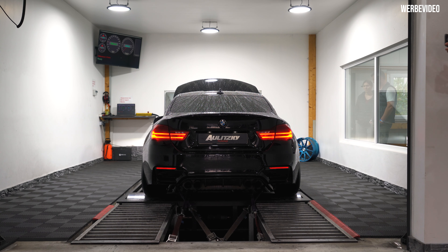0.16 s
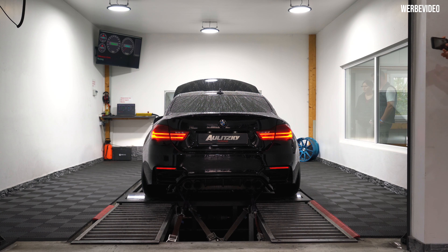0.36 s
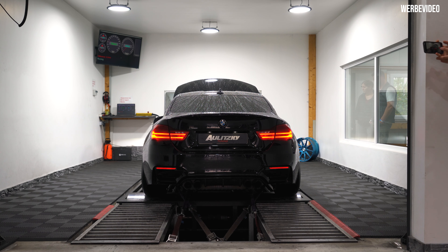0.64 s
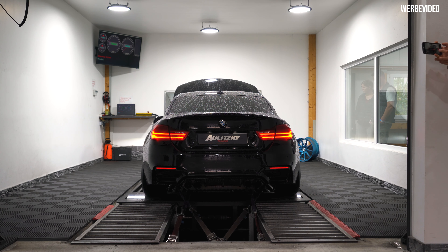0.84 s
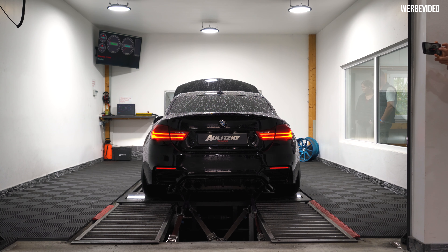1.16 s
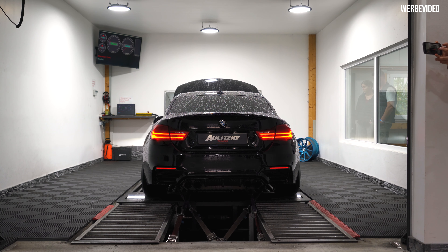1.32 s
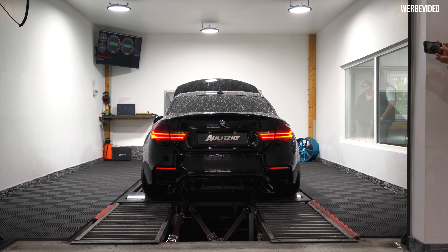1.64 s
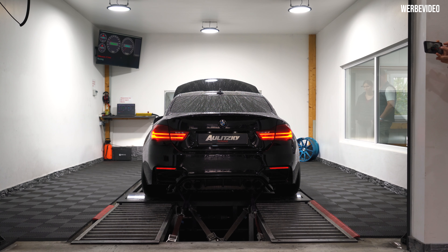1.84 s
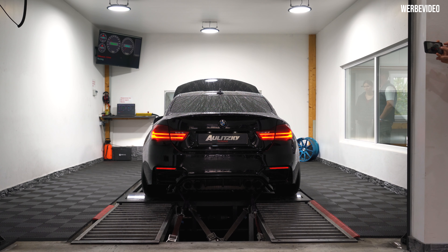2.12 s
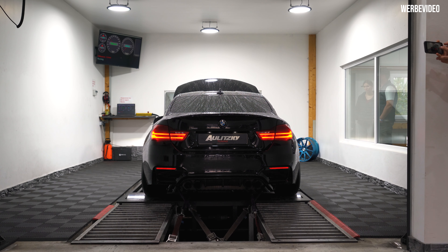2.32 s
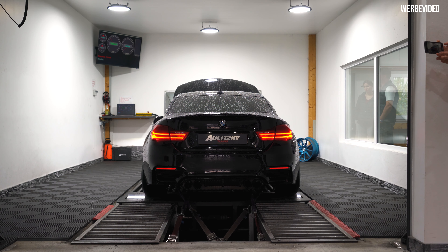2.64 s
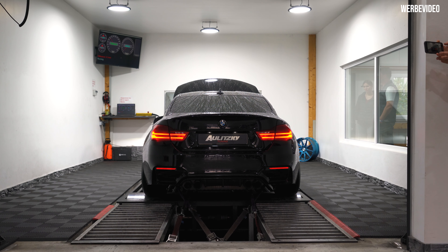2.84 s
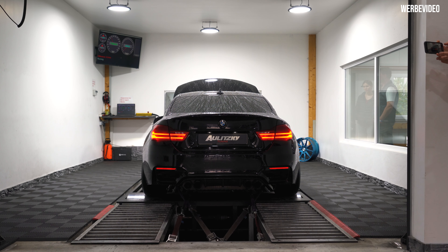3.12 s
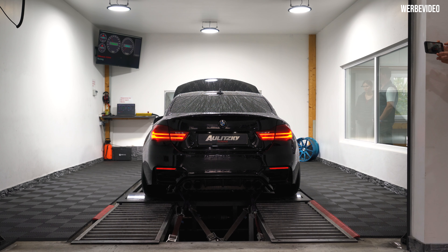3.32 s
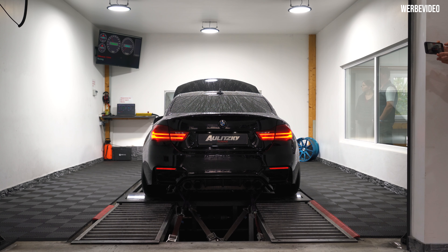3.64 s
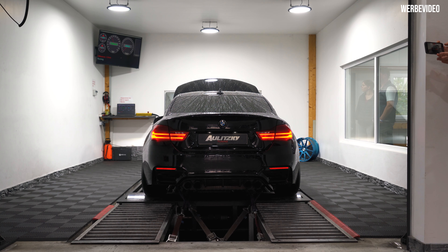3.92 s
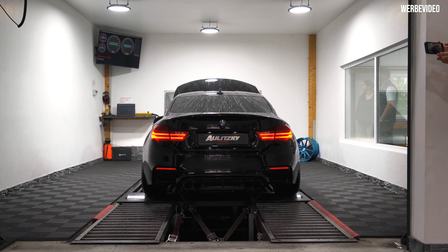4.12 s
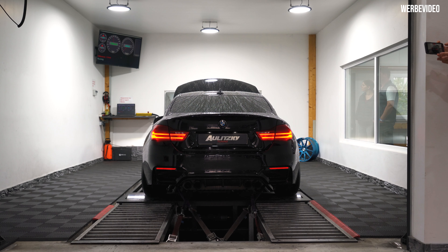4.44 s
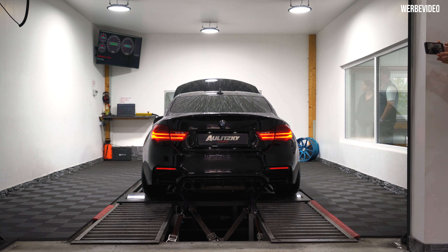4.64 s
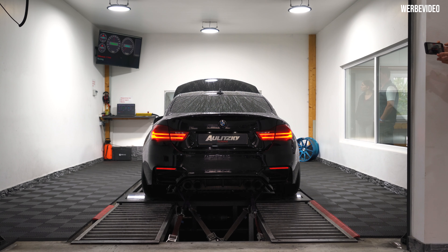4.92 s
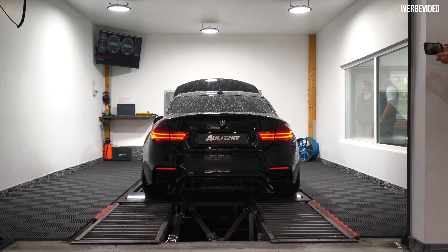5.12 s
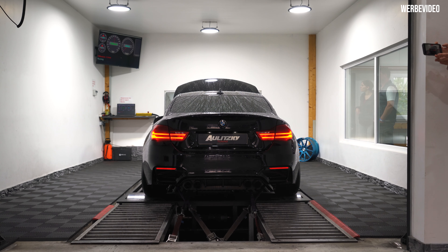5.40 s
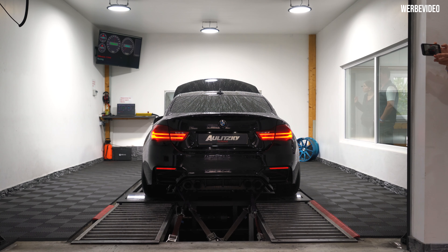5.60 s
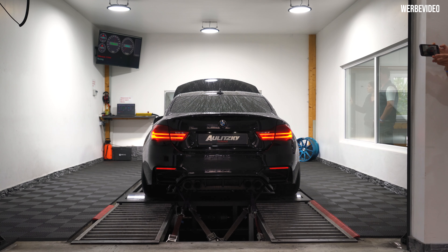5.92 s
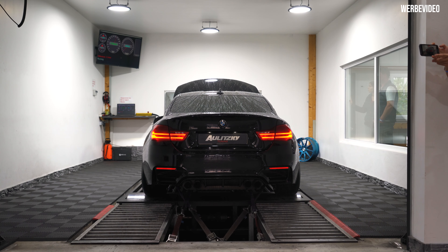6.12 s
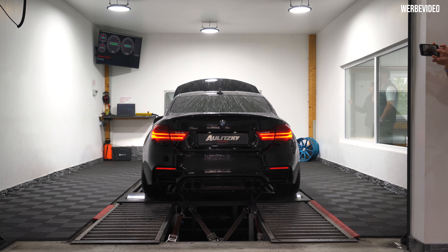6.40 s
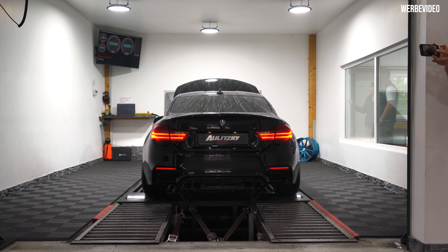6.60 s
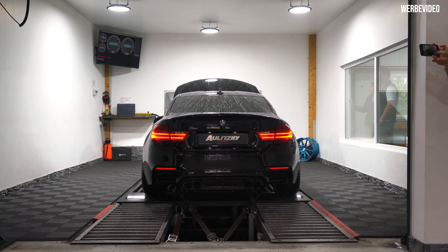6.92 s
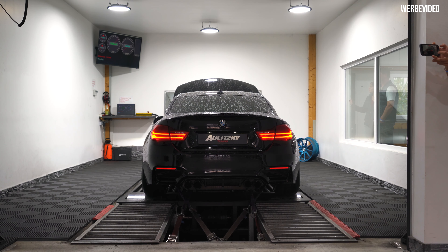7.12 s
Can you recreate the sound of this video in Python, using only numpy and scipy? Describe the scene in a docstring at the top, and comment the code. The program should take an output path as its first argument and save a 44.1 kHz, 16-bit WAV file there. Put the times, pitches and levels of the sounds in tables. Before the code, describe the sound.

Heard behind a car on rollers in a small reflective room, the engine starts as a heavy, pulsing low growl and accelerates without a gear change. Individual puffs blur into a dense drone, while gritty gas noise, faint gear whine and a brief, very thin turbo whistle join. The loud exhaust stays dominant and is still rising at the end.

```python
"""In a small hard-walled workshop a turbocharged straight-six, heard from behind, pulls at full throttle
on a chassis dyno from about 2000 to 5600 rpm. Each bank of three cylinders fires into its own pipe.
The exhaust is a stack of tones at multiples of the firing rate, which swell and fade as they climb through
the room's resonances. Shaped noise makes the gas roar, rasp and hiss; sine tones make the gears whine
and the turbo whistle."""
import sys
import numpy as np
from scipy import signal
from scipy.fft import rfft, irfft, next_fast_len
from scipy.io import wavfile
from scipy.ndimage import map_coordinates

SR = 44100
rng = np.random.default_rng(int(sys.argv[2]) if len(sys.argv) > 2 else 0)


def output_pcm(signal):
    """Save a mono or channel-first signal as 16-bit PCM at the path in sys.argv[1].

    Samples are clipped to [-1, 1] before scaling.
    """
    pcm = np.clip(np.atleast_2d(signal).T, -1, 1) * 32767
    wavfile.write(sys.argv[1], SR, np.round(pcm).astype(np.int16))


N = 320166  # length in samples

# strong low exhaust orders, before the note level and the room: columns multiple of the bank firing rate,
# level without boost/dB, level at full boost/dB, gain from lowest to top speed/dB
LOW_ORDERS = [(1.0, -39.5, -38, 13), (2.0, -15, -15.5, -1.5), (3.0, -21, -20.5, 2.5),
              (4.0, -26, -6.5, -19.5), (5.0, -29.5, -16, -6), (6.0, -29.4, -24.5, -2.5),
              (7.0, -27.5, -26.5, 2.6)]


def amp(db):
    """Turn decibels into a plain gain."""
    return 10 ** (np.asarray(db) / 20)


def unit(x):
    """Scale a signal to an rms of 1."""
    return x / np.sqrt(np.mean(x ** 2) + 1e-20)


def along(points, hz):
    """Read a value at each frequency from (Hz, value) points joined on a log axis."""
    f, v = np.transpose(points)
    return np.interp(np.log(hz + 1), np.log(f + 1), v)


def curves(rows):
    """Join timed points into one value per sample, for each column after the time."""
    s, *columns = np.transpose(rows)
    return [np.interp(np.arange(N) / SR, s, column) for column in columns]


def wobble(rate):
    """Draw a smooth random curve through a given number of random points a second."""
    knots = rng.standard_normal(int(N * rate / SR) + 4)
    coarse = np.linspace(0, N, N // 16)
    smooth = map_coordinates(knots, [coarse * rate / SR])
    return np.interp(np.arange(N), coarse, smooth)


def filtered(x, response):
    """Multiply the spectrum of x by a gain that depends on frequency."""
    size = next_fast_len(N + SR // 2)  # padded so the end does not wrap onto the start
    hz = np.fft.rfftfreq(size, 1 / SR)
    return irfft(rfft(x, size) * response(hz), size)[:N]


def noise(spectrum):
    """Colour white noise by a (Hz, dB) spectrum and scale it to an rms of 1."""
    return unit(filtered(rng.standard_normal(N), lambda hz: amp(along(spectrum, hz))))


def angle_of(hz):
    """Add up a changing frequency into its running phase in radians."""
    return 2 * np.pi * np.cumsum(hz) / SR


def lift(modes, hz):
    """Sum resonances: the real part is the dB added, the imaginary part turns the phase."""
    return sum(db / (1 + 2j * (hz - centre) / width) for centre, width, db in modes)


def brighten(x, corner_hz, db):
    """Raise or lower everything above a corner by a changing number of dB."""
    above = filtered(x, lambda hz: hz ** 6 / (hz ** 6 + corner_hz ** 6))
    return x + (amp(db) - 1) * above


def workshop(x, wet_db):
    """Add the walls' answer, a dying burst of noise, while keeping the total power about the same."""
    # time for the echo to die by 60 dB: columns f/Hz, time/s
    decay = [(60, 0.35), (1500, 0.55), (15000, 0.05)]
    hz, t, z = signal.stft(rng.standard_normal(SR // 2), SR, nperseg=256)
    t60 = along(decay, hz)[:, None]
    dying = z * amp(-60 * t / t60) / np.sqrt(t60)
    tail = signal.istft(dying, SR, nperseg=256)[1]
    echo = signal.fftconvolve(x, tail / np.linalg.norm(tail))[:N]
    return (x + amp(wet_db) * echo) / np.hypot(1, amp(wet_db))


def room_response(hz, odd):
    """Complex room gain: the pipes push together on even orders (0), against each other on odd ones (1)."""
    # broad colour of the room: columns f/Hz, even orders/dB, odd orders/dB
    room_colour = [(48.0, -2.5, -8), (62.6, 2.3, 8.7), (91, -10, -4), (155, 3.5, 2), (196, 5, 0.5),
                   (248.4, 9, 7), (316, 3, 4), (337.4, 2.5, -1.5), (384.5, 0.6, 1.5), (518, -4.5, -6),
                   (945, -9.5, -9.5)]
    # resonances that swell an order passing through: columns f/Hz, width/Hz, even lift/dB, odd lift/dB
    room_modes = [(145.8, 6.4, 8, 2.0), (164.4, 4.4, 6, 8.6), (231.5, 3.9, 5.5, 6.4), (280, 1.2, 6.5, 0.0),
                  (310.2, 6.1, -0.5, 6.7), (323.1, 2, 1.5, 8.5), (374.4, 12.6, -2, 6.7),
                  (407.5, 3, -11, 3.9), (679, 6.3, 4.0, 9.0)]
    # dips where wall reflections cancel: columns f/Hz, width/Hz, even lift/dB, odd lift/dB
    room_nulls = [(57.6, 2.0, -14, -19.6), (91.7, 10.3, -6, -5.5), (112.5, 11.7, -15.5, -16.9),
                  (131.6, 4.5, -8.5, -10.0), (152, 1.5, -3.5, -11.3), (169.4, 1.8, -17.5, -8.6),
                  (178.8, 2.5, -19, -6.8), (200.6, 0.99, -12, -1.8), (210.3, 6.1, -7.5, -10.1),
                  (223.8, 1.7, -4.5, -6.6), (236.9, 4, -8, -15.5), (258.9, 2.3, -19.5, -14.1),
                  (266.7, 6.5, -13, -5.9), (288.8, 4.9, -11.5, -8.0), (298.2, 5.5, -16.5, -2.2),
                  (383, 1.7, 2, -7.9)]
    # late reflections, which scallop the higher orders: columns f/Hz, strength beside the early sound
    late_strength = [(150, .04), (370, 0.13), (415, 0.63), (520, 0.8), (900, 0.8)]
    # random spread of their phase: columns f/Hz, spread/rad
    late_spread = [(300, 0.54), (540, 1.6), (680, 2.2)]
    late_s, ripple_step_hz = .0868, 17  # mean delay; span over which their phase stays alike
    phase_turn = 0.52  # share of a mode's phase turn that reaches the pulses; direct sound keeps them crisp
    late_gain_db = 1.24  # extra level at a late strength of 1

    colour = np.array(room_colour)[:, [0, 1 + odd]]
    modes = lift(np.array([*room_modes, *room_nulls])[:, [0, 1, 2 + odd]], hz)
    early = amp(along(colour, hz) + modes.real + 1j * phase_turn * modes.imag)
    scatter = map_coordinates(rng.standard_normal(size=512), [hz / ripple_step_hz])
    late = np.exp(1j * (along(late_spread, hz) * scatter - 2 * np.pi * hz * late_s))
    ripple = along(late_strength, hz)
    return early * (1 + ripple * late) * amp(late_gain_db * ripple)


def boom(angle, bank_hz, revs, boost, drift, flutter_db):
    """Add the lowest orders into one pressure pulse per firing, each swelling and fading with the room."""
    # exhaust note: columns t/s, level/dB
    note_level = [(0.0, 6.2), (0.9, 0.5), (1.5, -1.3), (1.8, -0.8), (2.1, -6), (2.9, -2.4), (3.9, 0.9),
                  (4.3, -1.5), (5.7, -2.5), (6.1, -0.7), (6.5, -0.0), (7.26, 1)]
    note_db, = curves(note_level)
    grid = np.linspace(20, 1100, 4096)  # Hz
    rooms = room_response(grid, 0), room_response(grid, 1)
    pulses = np.zeros(N)
    for multiple, unboosted_db, boosted_db, speed_db in LOW_ORDERS:
        k = round(multiple)
        engine_db = unboosted_db + (boosted_db - unboosted_db) * boost + speed_db * revs
        db = note_db + engine_db + flutter_db * wobble(45)
        tone = amp(db) * np.exp(1j * (k * angle + drift * wobble(1.94)))
        room_gain = np.interp(k * bank_hz, grid, rooms[k % 2])
        pulses -= (tone * room_gain).imag
    return np.sqrt(2) * pulses


def growl(angle, count, size):
    """Unequal cylinders repeat every third bank firing: weak lines between and above the main orders."""
    # upper orders over the lines between them: columns multiple of the bank firing rate, level/dB
    upper = [(8, 6.5), (9, 10.5), (10, 5), (12, 10.5), (16, 9.5), (30, 6)]
    # strength of a weak order by its frequency: columns f/Hz, level/dB
    pipe_colour = [(40, -86), (110, -38.5), (190, -33.5), (310, -35), (450, -34), (600, -36), (900, -39.5),
                   (1300, -46), (2000, -47.5), (3500, -46), (5000, -77)]
    # standing waves in the tailpipes: columns f/Hz, width/Hz, lift/dB
    pipe_modes = [(437, 41, 3.5), (557, 53, 2), (682, 35, 5.5), (928, 39, 5.5), (1250, 180, 7.5),
                  (1714, 144, 6.5)]
    n = np.arange(count)
    order = n / 3
    above_boom = order > len(LOW_ORDERS)  # boom() already makes the low whole orders
    whole_orders = amp(along(upper, order)) * above_boom
    strength = np.where(n % 3 > 0, 1, whole_orders)
    random_phase = np.exp(2j * np.pi * rng.random(count))
    cycle = irfft(strength * random_phase, size) * size / 2
    turns = angle / (6 * np.pi)  # one turn is three bank firings
    wave = np.interp(turns, np.arange(size) / size, cycle, period=1)
    return filtered(wave, lambda hz: amp(along(pipe_colour, hz) + lift(pipe_modes, hz).real))


def puffs(angle, depth, firing_depth):
    """Gas leaves in one puff per firing, stronger from one bank than from the other."""
    return unit(np.exp(depth * np.cos(angle) + firing_depth * np.cos(2 * angle)))


def gas_level(law, revs, boost):
    """Level in dB of a gas noise that grows with speed and boost."""
    base_db, speed_db, boost_db = law
    return base_db + speed_db * revs + boost_db * boost


def gas(angle, revs, boost):
    """Turbulence in the tailpipes: a pulsing roar, a rasp at the tips and the hiss of boosted air."""
    # colours of the three noises: columns f/Hz, relative level per Hz/dB
    roar_colour = [(15, -60), (35, -36), (55, -11), (90, -4.5), (160, -2.5), (300, 6.5), (520, -4.5),
                   (900, -0.5), (1400, -4), (2000, -11), (2800, -13), (4500, -25), (9000, -64)]
    rasp_colour = [(700, -31), (1600, 0), (2300, -4), (2800, -5.5), (3300, 0.5), (3950, 0), (4400, -5.5),
                   (5000, -11), (6200, -14.5), (8000, -23.5), (11000, -44), (16000, -55)]
    hiss_colour = [(2500, -37), (5000, 6.5), (7000, 2), (9000, 0), (10500, -3), (12500, -5), (15500, -11.5)]
    # roar: level at lowest speed/dB, gain up to top speed/dB, gain at full boost/dB
    roar_law = (-24, 1.74, 0.95)
    # rasp and hiss, before the fixed trims below: columns t/s, level/dB
    rasp_level = [(0.05, -32), (1.41, -31.5), (2.71, -26.5), (4.22, -27.5), (7.16, -22), (7.22, -22.5)]
    hiss_level = [(0.0, -52), (0.02, -57.5), (1.09, -53.5), (1.98, -48.5), (2.63, -47), (3.92, -53),
                  (7.18, -49), (7.26, -50)]
    rasp_trim_db, hiss_trim_db = 0.4, 7

    roar_db = gas_level(roar_law, revs, boost) + 0.6 * wobble(25)
    rasp_db = curves(rasp_level)[0] + rasp_trim_db + 0.75 * wobble(30)
    hiss_db = curves(hiss_level)[0] + hiss_trim_db
    chug = .26 - .13 * revs  # the puffs run together at speed
    roar = amp(roar_db) * noise(roar_colour) * puffs(angle, chug, firing_depth=0.11)
    rasp = amp(rasp_db) * noise(rasp_colour) * puffs(angle, chug / 2, firing_depth=.14)
    hiss = amp(hiss_db) * noise(hiss_colour)
    # a faster jet loses rumble and grows brighter
    thinning_db = 5 * revs
    roar = amp(-thinning_db) * brighten(roar, corner_hz=150, db=thinning_db)
    roar = brighten(roar, corner_hz=1090, db=-6.0 + 10.3 * revs)
    rasp = amp(-3 * revs) * brighten(rasp, corner_hz=2900, db=-3.0 + 6.4 * revs)
    rasp = brighten(rasp, corner_hz=4900, db=-2.5 + 5.2 * revs)
    return roar + rasp + hiss


def gears(angle, revs):
    """Meshing teeth make tones locked to the crank, louder near the resonance of the gear casing."""
    # gear whines before the casing: columns multiple of the bank firing rate, level at lowest speed/dB,
    # level at top speed/dB
    whines = [(59, -55, -51), (71, -50, -72), (82, -67, -56.5), (96, -74, -63.5)]
    # ringing of the gear casing: columns f/Hz, width/Hz, lift/dB
    casing = [(3780, 330, 12)]
    mesh = np.zeros(N)
    for k, low_db, top_db in whines:
        level = amp(low_db + (top_db - low_db) * revs)
        mesh += level * np.sin(k * angle + rng.uniform(0, 2 * np.pi))
    return np.sqrt(2) * filtered(mesh, lambda hz: amp(lift(casing, hz).real))


def turbo(waver):
    """The compressor blades make one slightly unsteady tone that climbs to a very high pitch."""
    # turbo whistle: columns t/s, f/Hz, level/dB
    whistle = [(1.5, 10900, -78), (1.85, 12130, -61), (2.05, 12930, -60), (2.55, 15000, -54),
               (2.8, 15780, -59), (3.3, 16300, -63)]
    hz, db = curves(whistle)
    return np.sqrt(2) * amp(db) * np.sin(angle_of(hz * (1 + waver * wobble(500))))


def scene():
    """Let engine speed and boost drive the layers, then add them up."""
    # engine speed: columns t/s, firing rate of one bank/Hz
    speed = [(0.0, 47.88), (0.66, 52.39), (1.32, 57.55), (1.98, 64.56), (2.31, 68.77), (2.64, 73.25),
             (3.3, 82.76), (4.29, 98.76), (4.95, 108.5), (5.94, 122.2), (6.27, 127.6), (6.93, 137),
             (7.26, 140)]
    first_firing_s = .0125
    bank_hz, = curves(speed)
    boost, = curves([(2.1, 0), (2.74, 1)])  # the turbo spools up once: (s, boost)
    revs = (bank_hz - bank_hz.min()) / np.ptp(bank_hz)  # 0 at the lowest speed, 1 at the top
    angle = angle_of(bank_hz) - 2 * np.pi * bank_hz[0] * first_firing_s

    drift = 1 * np.sqrt(revs)  # radians; slow firings stay crisp, fast ones smear in the room
    low_exhaust = boom(angle, bank_hz, revs, boost, drift, flutter_db=1.62)
    shaky = angle + 0.0086 * wobble(30)  # no two combustions are timed quite alike
    pipes = amp(3.15 * (revs - 1)) * growl(shaky, count=180, size=8192)
    pipes = brighten(pipes, corner_hz=503, db=-9.0 + 7.93 * boost)  # boost steepens the pulses
    exhaust = low_exhaust + workshop(pipes, wet_db=-1)
    whine = gears(angle + 0.028 * wobble(200), revs) + turbo(waver=.006)
    return (exhaust + gas(angle, revs, boost) + workshop(whine, wet_db=12))[None]


def record(dry):
    """Softly flatten the loudest pulses near full scale, thin the deepest bass and stop at 15.75 kHz."""
    top_hz, fade_s = 15750, .004
    x = amp(0.55) * dry[0]
    flattened = x / (1 + np.abs(x / 1.01) ** 6) ** (1 / 6)
    faded = flattened * signal.windows.tukey(N, 2 * fade_s * SR / N)  # short fade at both ends
    return filtered(faded, lambda hz: (hz < top_hz) * hz ** 2 / (hz ** 2 + 25 ** 2))[None]


dry = scene()
out = record(dry)
output_pcm(out)
```